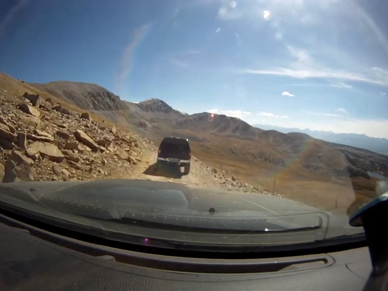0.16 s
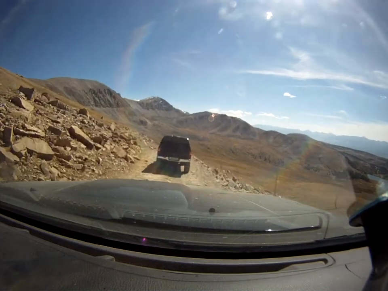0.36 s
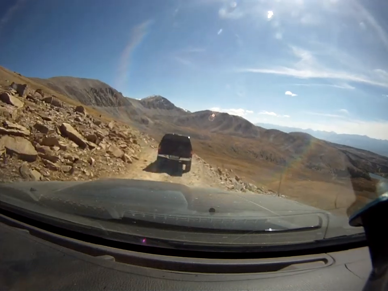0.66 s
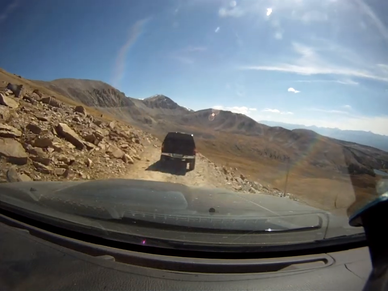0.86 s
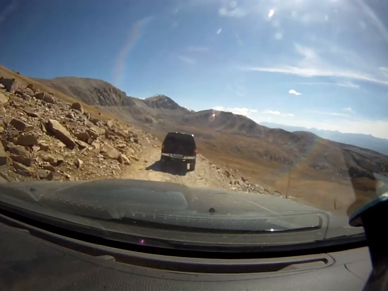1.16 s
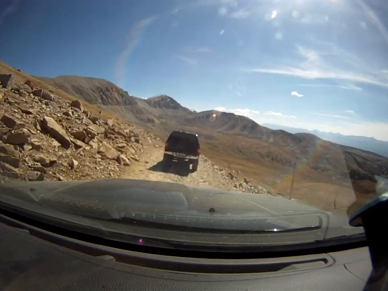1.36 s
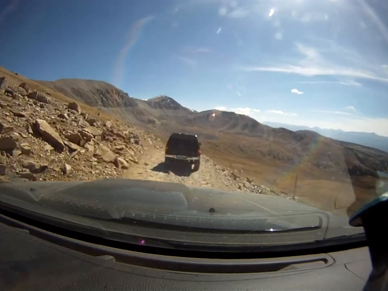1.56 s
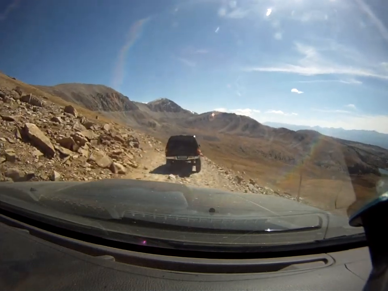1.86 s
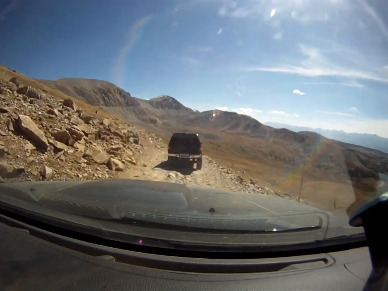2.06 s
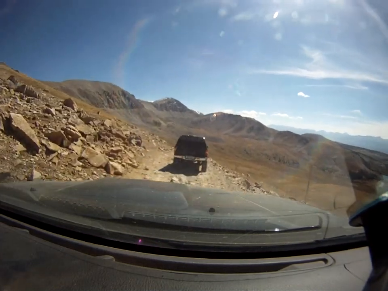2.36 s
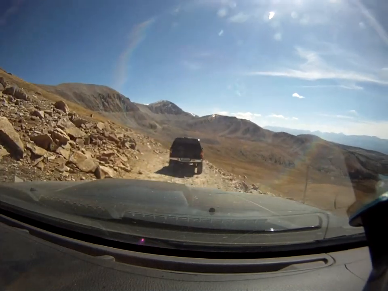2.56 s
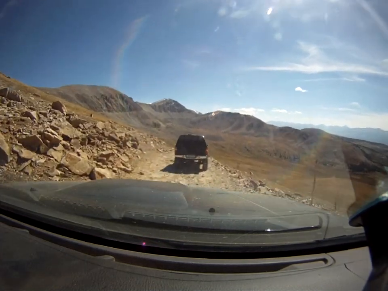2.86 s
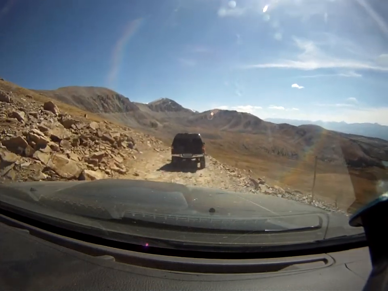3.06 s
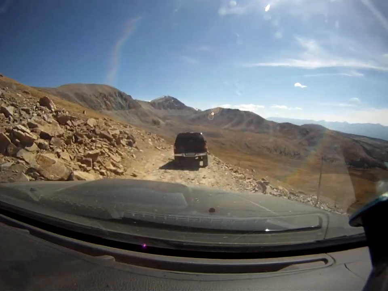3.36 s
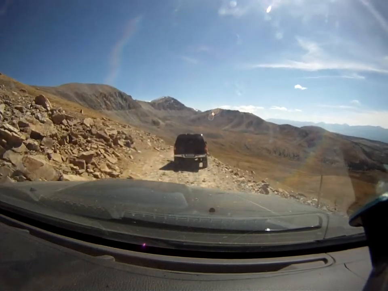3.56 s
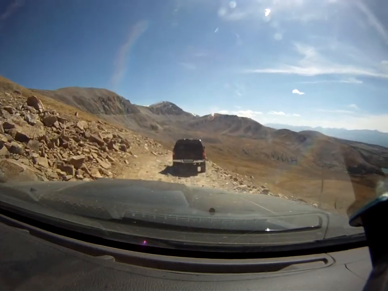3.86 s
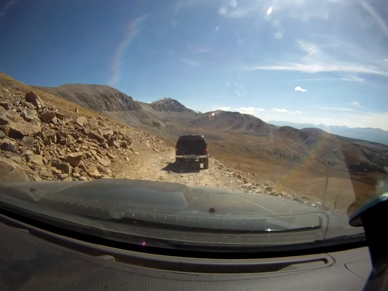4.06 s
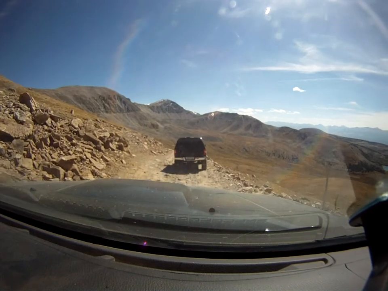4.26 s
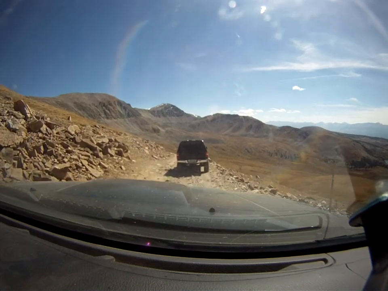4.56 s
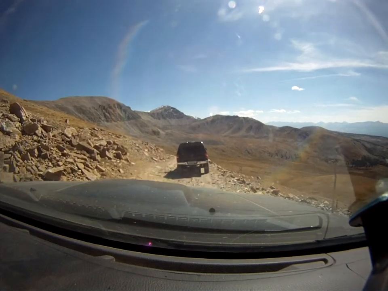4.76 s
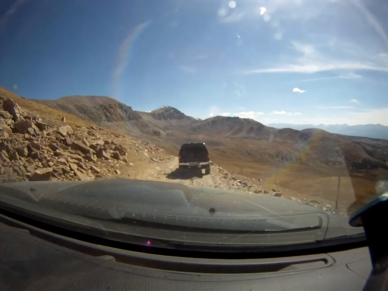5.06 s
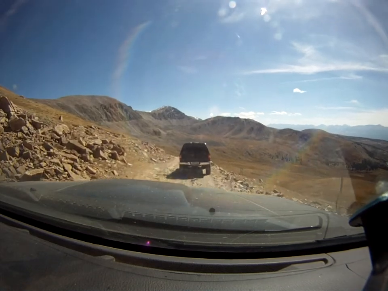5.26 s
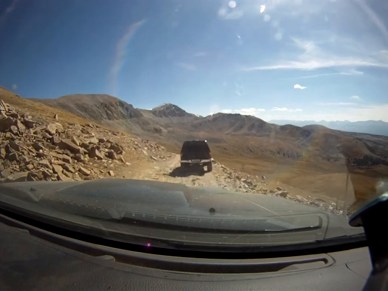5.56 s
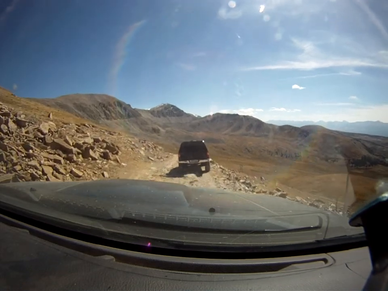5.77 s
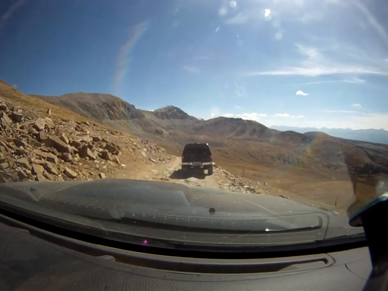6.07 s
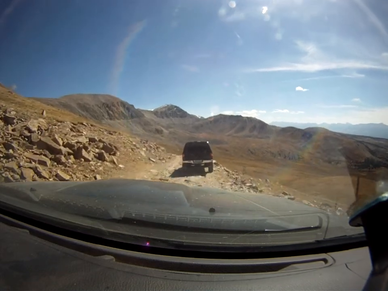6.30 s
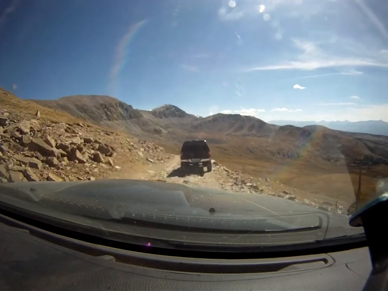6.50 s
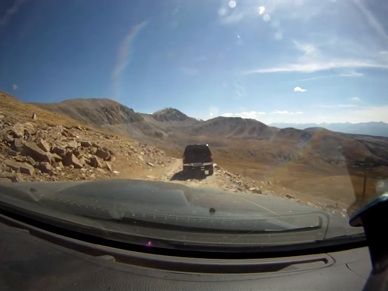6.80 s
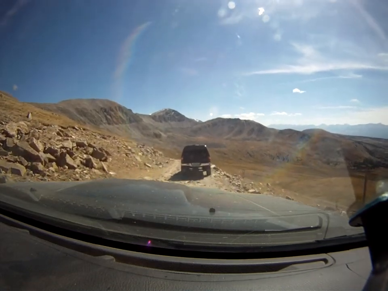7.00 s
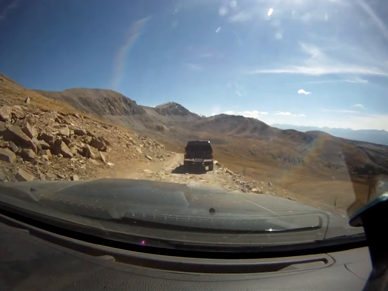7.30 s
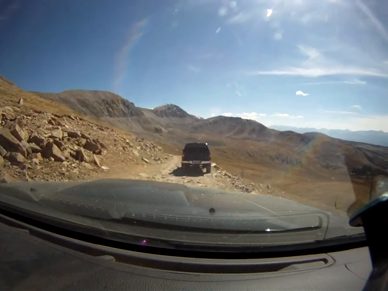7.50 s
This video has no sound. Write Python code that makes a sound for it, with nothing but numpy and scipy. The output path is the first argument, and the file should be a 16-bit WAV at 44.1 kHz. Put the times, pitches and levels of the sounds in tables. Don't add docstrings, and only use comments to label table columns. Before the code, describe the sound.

Inside a slow four-wheel-drive, a low engine hum gradually sinks in pitch while tyres grind over stones, with jolting thumps, knocks and gravel ticks.

```python
import sys
import numpy as np
from scipy import signal
from scipy.fft import rfft, irfft, next_fast_len
from scipy.io import wavfile
from scipy.ndimage import uniform_filter1d, map_coordinates

SR = 44100
rng = np.random.default_rng(int(sys.argv[2]) if len(sys.argv) > 2 else 0)


def wrap_up_sound(samples):
    columns = np.atleast_2d(samples).T
    tamed = np.clip(columns, -1, 1)
    steps = np.round(tamed * 32767).astype(np.int16)
    wavfile.write(sys.argv[1], SR, steps)


def gain_from_db(level_db):
    decades = np.asarray(level_db, float) / 20
    return 10 ** decades


N = 336924

# t/s, f/Hz
HUM_PITCH = [(0, 125.6), (1.1, 123.2), (2.3, 120.7), (3.5, 118.7), (4.7, 116.2), (5.5, 113.9), (6.5, 112.5),
             (7.64, 110.8)]
# t/s, level/dB
HUM_LEVEL = [(0, -33.5), (.64, -35.5), (.85, -33), (1.3, -33), (1.42, -29), (1.55, -34), (1.93, -34.5),
             (2.15, -31.5), (2.4, -37), (3.2, -34), (3.66, -40), (4.0, -33), (4.32, -33.5), (5.2, -40),
             (5.64, -41), (6.0, -36.5), (6.7, -40.5), (7.5, -34.5)]
# t/s, loss/dB, length/s
MOUNT_LULLS = [(.79, 14, 0.02), (.94, 12, 0.036), (2.0, 4, 0.09), (3.77, 12, 0.013), (3.94, 11, 0.038),
               (4.12, 11.5, 0.093), (5.32, 9, 0.048), (6.19, 8.5, 0.032), (6.42, 17, 0.034),
               (6.55, 15, 0.038), (6.93, 9.5, 0.14), (7.15, 7, 0.2), (7.33, 14, 0.034), (7.63, 8, 0.1)]
# t/s, level/dB, length/s
OCTAVE_SWELLS = [(0, -46, 0.17), (1.7, -50.5, 0.96), (2.65, -47.5, 0.19), (2.9, -40, 0.15),
                 (3.3, -49.5, 0.34), (3.5, -50, .15), (3.7, -44.5, 0.22), (4.72, -43.5, 0.15),
                 (5.0, -49, 0.65), (5.9, -46.5, 0.11)]
# t/s, level/dB, length/s
TWELFTH_SWELLS = [(.5, -58, 0.23), (2.6, -50, 0.21), (2.95, -50.5, 0.29), (3.3, -50, 0.15), (3.7, -51, 1),
                  (4.28, -49, 0.1), (4.7, -52, 0.11), (5.5, -60, 0.28)]


def engine():
    turns = np.cumsum(curves(HUM_PITCH)[0] + 0.2 * wobble(8)) / SR
    hum_db = curves(HUM_LEVEL)[0] - summed(MOUNT_LULLS)
    levels = [hum_db, swells_db(OCTAVE_SWELLS, -79), swells_db(TWELFTH_SWELLS, -79)]
    out = np.zeros(N)
    for k, db in enumerate(levels):
        unsteady_db = 0.8 * wobble(15)
        out += gain_from_db(db + 2.0 + unsteady_db) * np.sin(2 * np.pi * (k + 1) * turns + k)
    return out


# f/Hz, level/dB per Hz
HEAVE_SPECTRUM = [(8, -34), (15, -1), (28, 0), (40, -1), (50, -12), (70, -50), (110, -120)]
# f/Hz, level/dB per Hz
BOOM_SPECTRUM = [(25, -50), (40, -12), (49, 0), (58, -1), (72, -12), (100, -12), (135, -30), (230, -120)]
# t/s, level/dB, length/s
HEAVE_SWELLS = [(.2, -28, 0.073), (.45, -25.5, 0.13), (.62, -27.5, 0.24), (.8, -29, 0.2),
                (1.13, -26.5, 0.097), (1.32, -28.5, 0.1), (1.64, -28, 0.043), (1.78, -24, 0.06),
                (2.33, -26, 0.044), (2.47, -21.5, 0.022), (2.57, -31, 0.04), (2.68, -35, 0.086),
                (2.92, -27.5, 0.069), (3.15, -33, 0.2), (3.45, -26.5, 0.049), (3.56, -27.5, 0.036),
                (3.9, -33, 0.2), (4.08, -32, 0.068), (4.23, -37, 0.053), (4.34, -32, 0.04),
                (4.84, -32, 0.11), (5.1, -33.5, .12), (5.25, -32.5, 0.13), (5.48, -24.5, 0.084),
                (5.87, -31.5, 0.11), (6.0, -34, 0.036), (6.2, -43, 0.11), (6.55, -38.5, 0.23),
                (7.21, -37, 0.065), (7.33, -35.5, .1)]
# t/s, level/dB, length/s
BOOM_SWELLS = [(.0, -28.5, 0.09), (.33, -32.5, 0.23), (.62, -28.5, 0.092), (.8, -28, 0.21),
               (1.07, -27, 0.051), (1.24, -34, 0.053), (1.45, -35.5, 0.23), (2.42, -30, 0.1),
               (2.57, -28, 0.028), (2.68, -35, 0.075), (2.93, -35, 0.12), (3.15, -36.5, 0.074),
               (3.34, -30.5, 0.043), (3.56, -33.5, 0.055), (3.78, -29, 0.082), (4.17, -36.5, 0.034),
               (4.3, -41, 0.042), (4.72, -37, 0.054), (4.87, -37, 0.16), (5.17, -48, 0.037),
               (5.33, -35, 0.069), (5.47, -27.5, 0.063), (5.66, -31.5, 0.13), (5.87, -35, 0.037),
               (6.11, -38, 0.034), (6.36, -40, 0.054), (6.55, -40, 0.25), (7.21, -32, 0.045),
               (7.45, -44, 0.093), (7.6, -38, 0.091)]


def body():
    heave_db = swells_db(HEAVE_SWELLS, -38)
    boom_db = swells_db(BOOM_SWELLS, -41)
    spectra = (HEAVE_SPECTRUM, BOOM_SPECTRUM)
    swings = np.array([coloured(rng.standard_normal(N), spectrum) for spectrum in spectra])
    power = np.abs(uniform_filter1d(swings ** 2, SR // 12, axis=1))
    heave, boom = swings / np.sqrt(1.5 + power)
    return gain_from_db(heave_db) * unit(heave) + gain_from_db(boom_db) * unit(boom)


# t/s, weight on the tread/dB, loose stones/dB
TREAD_LOAD = [(0, -38.5, 0.5), (.72, -39, 0), (1.25, -41.5, 2.5), (1.5, -44, 0.5), (2.04, -42, 0.5),
              (2.19, -38.5, 1), (2.68, -43, 0), (2.96, -41, -0.5), (3.3, -42, 0.5), (3.91, -41.5, 0),
              (4.5, -45, -0.5), (5.15, -43.5, -1), (5.72, -43, -0.5), (5.92, -43, 4), (6.5, -43.5, 0),
              (6.94, -44.5, 0.5), (7.15, -43, 1.5), (7.64, -42, 1)]
# t/s, gain/dB, length/s
TYRE_SLIPS = [(.3, 3, 0.067), (.63, 3, .05), (1.3, 1, 0.14), (2.4, 3, 0.08), (3.82, 4, 0.053),
              (4.55, 2, .04), (4.73, 1, 0.067), (5.02, 2, 0.065), (5.6, -1, .04), (5.93, -1, 0.05),
              (6.64, 2.5, 0.061), (7.1, 0.5, 0.063), (.1, 1.5, .03), (.68, 1.5, .015), (1.53, 0.5, 0.027),
              (1.78, 3, .02), (1.89, -4.5, 0.033), (2.62, 4, .03), (2.73, 2, .03), (3.34, 1.5, .03),
              (4.4, 0.5, 0.014), (5.46, 3, .03), (6.01, -2, .02), (7.46, 4, .02)]
# t/s, gain/dB, length/s
SAND_SPRAYS = [(.15, -1.5, .15), (1.41, 2.5, .07), (4.35, -3, 0.074), (5.0, 1.5, .1), (6.55, 2, .06),
               (7.15, 2.5, 0.12)]
# t/s, gain/dB, length/s
GRIND_SWELLS = [(.1, -1.5, 0.018), (.2, -1.5, .02), (.31, 1, .03), (.42, -3.5, 0.066), (.57, 0, .03),
                (.86, 5, .02), (1.32, 4.5, .02), (1.45, 2.5, .02), (1.54, -1.5, .015), (1.61, 3, 0.019),
                (2.1, -5.5, 0.045), (2.5, 0.5, .02), (2.57, 1.5, .02), (2.67, 0, .02), (3.06, 5, .015),
                (3.33, 4.5, .02), (3.8, 4, .03), (4.05, 4.5, .02), (4.4, 2, .015), (4.53, -0.5, .02),
                (4.76, 6.5, 0.032), (5.05, 0, .02), (5.26, 3, .015), (5.32, 1.5, .03), (5.41, 3.5, .015),
                (5.5, 0, .02), (5.72, 1.5, .02), (6.64, 6, .015), (6.79, 1, 0.012), (6.92, 2, 0.022),
                (7.08, 5.5, .02), (7.21, 5, .015), (7.5, 0.5, .02)]
# f/Hz, level/dB per Hz
GRIND_SPECTRUM = [(70, -120), (105, 1.5), (150, 3), (190, -2), (300, -1.5), (450, -4.5), (570, -10.5),
                  (680, -25), (850, -23.5), (1100, -59), (1500, -120)]
# f/Hz, level/dB per Hz
GRIT_SPECTRUM = [(410, -34), (700, -0.5), (829, -3), (907, -2), (1510, -4.5), (2430, -6.5), (2700, -2.5),
                 (3300, -10.5), (4290, -59), (7260, -120)]
# f/Hz, level/dB per Hz
FIZZ_SPECTRUM = [(2060, -29), (3500, -1.5), (4210, -4), (4740, -0.5), (5210, -4.5), (5800, -8.5),
                 (7540, -9), (12800, -120)]


def tyres():
    grind_db, loose_db = curves(TREAD_LOAD)
    loose_db = loose_db + summed(TYRE_SLIPS)
    grit_db = -56 + 0.62 * (grind_db + 40) + loose_db
    fizz_db = -66.5 + 0.11 * (grind_db + 37.5) + 1.06 * loose_db + summed(SAND_SPRAYS)
    grind_db = grind_db + summed(GRIND_SWELLS)

    lumps = 0.7 * np.tanh(wobble(14))
    scuff_sizes = gain_from_db(np.minimum(4 * rng.exponential(size=N), 6))
    scuffs = (rng.random(N) < 60 / SR) * scuff_sizes
    t = np.arange(SR // 10) / SR
    trail = (1 - np.exp(-t / 0.004)) * gain_from_db(-60 * t / 0.031)
    crunch = np.sqrt(1 + 0.22 * unit(signal.fftconvolve(scuffs, trail)[:N]) ** 2)

    grind = gain_from_db(0.9 * lumps + 1.3 * wobble(50)) * crunch ** 0.6 * patchy(patchy_db=0.8)
    grit = gain_from_db(2.35 * lumps + 0.26 * wobble(27)) * crunch * patchy(patchy_db=1.2)
    fizz = gain_from_db(0.067 * lumps + 0.87 * wobble(25)) * crunch ** 0.68 * patchy(patchy_db=0.0)
    out = gain_from_db(grind_db) * coloured(grind, GRIND_SPECTRUM)
    out += gain_from_db(grit_db) * coloured(grit, GRIT_SPECTRUM)
    out += gain_from_db(fizz_db) * coloured(fizz, FIZZ_SPECTRUM)
    return out


# t/s, level/dB, thud/dB, snap/dB, ring f/Hz
STONE_HITS = [(.5462, -43.5, -7, 2, 1060), (2.9946, -30.5, -2, -1.5, 1390), (3.2278, -28, -6, -5, 2300),
              (3.4868, -33, 4, -33, 1420), (5.8583, -42.5, 1, -18, 2820), (5.9224, -34.5, -26, 2, 2820),
              (6.2408, -31, -1.5, 1, 3030), (6.477, -29, 2.5, -8, 1800), (6.492, -32, -1, -6, 2500),
              (6.591, -46.5, 21.5, -25, 2750), (7.2965, -31, 12.5, -25, 1660), (7.304, -49, 16, -25, 1200),
              (7.4069, -27, -1, 3.5, 1730)]
# t/s, level/dB, thud/dB, snap/dB, ring f/Hz
TRAY_SHAKES = [(1.9907, -44, 12, -28, 1000), (2.2631, -29.5, 11, -1.5, 2160), (3.246, -43.5, 9, -23, 1520),
               (4.0859, -36, 8, -8, 1900), (4.7232, -45, 14.5, -26, 1560), (5.7331, -47.5, 8, 0.5, 1040),
               (6.7067, -29, 10.5, -9, 3200), (6.9141, -44, -8, -27, 2310), (7.0699, -48.5, 10, -23, 1590),
               (7.366, -29, 6, -10, 1450), (7.5573, -45.5, 15, -26, 1210)]
# t/s, level/dB, thud/dB
STOP_BUMPS = [(0.5203, -51, 15), (.82, -40.5, 23), (0.8538, -44.5, 12), (1.275, -51, 16),
              (1.8439, -54.5, 21.5), (1.929, -42, 7), (1.9737, -53, 27), (2.1743, -49.5, 18.5),
              (2.3469, -45.5, 14), (3.0519, -55, 17), (4.397, -53, 5), (5.138, -44, 18), (5.165, -49.5, 18),
              (5.4697, -53, 22), (5.7754, -54.5, 23.5), (6.786, -62, 22), (7.128, -62, 23), (.829, -44, 19),
              (6.72, -52, 20), (7.32, -58, 20)]
# t/s, level/dB, ring f/Hz
GRAVEL_TICKS = [(1.1882, -42, 1120), (2.7, -46, 1060), (2.9585, -42.5, 1100), (3.4, -55, 2500),
                (3.4456, -45, 1440), (4.336, -48.5, 2600), (4.177, -52, 2600), (4, -51, 2800),
                (4.8, -50, 2480), (3.8, -47, 1440), (5.929, -44, 2800), (5.98, -47, 2000),
                (7.633, -46, 1500), (6.6, -46, 2910), (5.9688, -45, 3000), (6.139, -44.5, 1210),
                (6.314, -48, 2800), (6.3859, -49, 2000), (6.571, -50, 1040), (6.9012, -42, 1390),
                (7.248, -50, 2500), (6.8, -44, 3100), (3.157, -47, 2800), (7.279, -45, 2600),
                (1.312, -50, 2000), (5.436, -55, 2600), (4.4, -51, 2200), (5.612, -49.5, 1340),
                (7.157, -54, 2200), (.966, -52, 1900), (4.88, -54, 2600), (6, -51, 1500),
                (4.248, -49, 2800), (6.5, -43, 2000), (3.236, -41, 2500)]


def blows():
    stones = [(*row, -18) for row in STONE_HITS]
    shakes = [(*row, -5) for row in TRAY_SHAKES]
    bumps = [(s, db, thud_db, -21, 1075, thud_db - 22) for s, db, thud_db in STOP_BUMPS]
    ticks = [(s, db, -4, -17, hz, -24) for s, db, hz in GRAVEL_TICKS]
    return stones + shakes + bumps + ticks


def knocks():
    out = np.zeros(N + SR)
    t = np.arange(SR // 6) / SR
    contacts = blows()
    chance = rng.standard_normal((len(contacts), 5, len(t)))
    for (s, db, thud_db, snap_db, ring_hz, tray_db), noise in zip(contacts, chance):
        soft = np.clip((-36 - db) / 8, 0, 1)
        depth = 1.026 ** np.clip(thud_db / 24, 0, 1)
        rise = 1 - np.exp(-t / (0.0012 + 0.0019 * soft))

        def dying(t60, tail):
            return rise * (gain_from_db(-60 * t / t60) + tail * gain_from_db(-60 * t / 0.2))

        def crack_response(f):
            broad = resonance(f, 790, 970) * resonance(f, 2480, 2100)
            return broad / (1 + 1j * f / 3000 - (f / 3300) ** 2)

        push = 0.55 * (t < 0.001)
        thud = dying(0.055, 0.26 - 0.14 * soft) * noise[0] + push
        thud = peaked(filtered(thud, lambda f: panels(f * depth)))
        tray = dying(0.045, 0.055) * (noise[1] + 2.6 * (t < 0.0006))
        tray = peaked(filtered(tray, lambda f: resonance(f, 855, 147) ** 2))
        crack = even(dying(0.031, 0.081) * noise[2])
        crack = peaked(filtered(crack, crack_response))
        ring = even(dying(0.049, 0.061) * noise[3])
        ring = peaked(filtered(ring, lambda f: resonance(f, ring_hz, 0.43 * ring_hz) ** 2))
        snap = dying(0.027, 0.084) * noise[4]
        snap = peaked(filtered(snap, lambda f: resonance(f, 4380, 1850) ** 2))

        blow = gain_from_db(thud_db - 3.5) * thud + gain_from_db(tray_db + 1.5) * tray
        blow += gain_from_db(-3.0 - soft + 0.1 * max(thud_db - 10, 0)) * crack
        blow += gain_from_db(-8.5 + 4.5 * soft) * ring
        blow += gain_from_db(snap_db - 8.5) * snap
        out[round((s - 0.0008) * SR):][:len(t)] += gain_from_db(db) * blow
    return out[:N]


# f/Hz, width/Hz, level/dB
PANEL_MODES = [(213, 90, -29), (337, 163, -3.5), (514, 84, 6), (622, 116, -2)]


def panels(f):
    modes = 0
    for k, (hz, width, db) in enumerate(PANEL_MODES):
        modes = modes + (-1) ** k * gain_from_db(db) * resonance(f, hz, width)
    return modes / (1 + 1j * f / 1100) ** 2


# t/s, f/Hz, level/dB, length/s
TRIM_PINGS = [(.32, 1600, -54, .03), (.55, 4600, -53, .025), (.825, 2550, -48, .012),
              (1.19, 4600, -56, .02), (1.62, 2850, -54, .02), (2.05, 2300, -53, .035),
              (2.19, 1620, -52, .04), (2.35, 1420, -50, .02), (2.8, 1400, -52, .02), (3.82, 1610, -53, .02),
              (4.21, 2300, -58, .05), (4.338, 2850, -55, .012), (4.73, 1590, -53, .03),
              (4.79, 2200, -55, .012), (5.848, 4400, -57, .008), (6.498, 2680, -45, .012),
              (6.595, 2700, -35, .007), (6.594, 1900, -47, .006), (6.596, 3400, -48, .006),
              (5.055, 1800, -58, .02), (5.63, 1300, -54, .015), (7.13, 950, -53, .025)]
# t/s, f/Hz, level/dB, length/s
PANEL_NOTES = [(0.826, 720, -34, .014), (.826, 410, -36, .016), (.862, 520, -41, .02),
               (1.942, 292, -43, .03), (1.932, 1100, -48, 0.0074), (2.178, 480, -43, .012),
               (2.266, 565, -27, .008), (3.058, 520, -41, .014), (3.237, 2000, -38, .014),
               (4.091, 846, -40, .012), (4.735, 1000, -51, .015), (5.141, 500, -35, .01),
               (5.17, 550, -34, .01), (5.483, 556, -46, .02), (5.78, 520, -43, .012),
               (5.869, 71.6, -33, .07), (6.246, 2950, -36, .008), (6.6, 496, -32, .013),
               (6.71, 1390, -36, 0.0095), (6.793, 560, -45, .02), (7.369, 850, -38, .008),
               (7.41, 3900, -40, .01), (.831, 527, -34, .012), (.868, 420, -41, .016),
               (1.987, 480, -37, .016), (2.257, 400, -36, .014), (2.359, 400, -39, .014),
               (2.278, 520, -37, .012), (2.996, 1410, -39, .006), (3.23, 2350, -38, .006),
               (3.269, 400, -40, .01), (4.099, 520, -42, .014), (5.111, 453, -35, .01),
               (5.152, 400, -40, .012), (6.243, 1500, -42, .005), (6.481, 523, -39, .012),
               (6.5, 2000, -44, .012), (6.711, 3200, -41, .007), (6.724, 483, -38, .024),
               (7.305, 372, -28.5, 0.015), (7.299, 560, -27, .01), (6.71, 496, -31, .012),
               (6.74, 520, -42, .024), (1.281, 560, -47, .01), (6.522, 2650, -53, .03),
               (.895, 320, -41, .016), (7.324, 330, -40, .024), (7.37, 330, -31, 0.016),
               (7.413, 370, -33, 0.017)]
# t/s, f/Hz, level/dB, length/s
BODY_LURCHES = [
    (5.456, 36, -26, .07),
    (5.455, 139, -39, 0.045),
    (5.622, 50, -32, .07),
    (5.87, 49, -20.5, 0.079),
]


def pings():
    t = np.arange(N) / SR
    out = np.zeros(N)
    drift = np.cumsum(wobble(90)) / SR
    flutter = gain_from_db(2 * wobble(150))
    for s, hz, db, length in TRIM_PINGS + PANEL_NOTES + BODY_LURCHES:
        near = slice(round((s - 0.1) * SR), round((s + 0.1) * SR))
        u = t[near] - s
        swell = np.exp(-(2 * u / length) ** 2)
        out[near] += gain_from_db(db - 2.5) * swell * np.sin(2 * np.pi * hz * (u + 0.008 * drift[near]))
    return out * flutter


# t/s, level/dB, length/s
AXLE_THUMPS = [(.3, -46, 0.034), (.55, -41.5, 0.031), (.65, -38, 0.026), (.83, -37, .03), (.92, -42, .03),
               (1.05, -48, 0.033), (1.31, -45, 0.032), (1.97, -37.5, 0.037), (2.35, -43, 0.027),
               (2.58, -43.5, 0.037), (3.0, -44, .03), (3.27, -40, 0.027), (3.6, -43.5, .03),
               (3.85, -41, .03), (4.08, -44, .03), (4.77, -42, 0.034), (5.47, -43, 0.037), (5.57, -44, .03),
               (5.87, -41, .03), (6.02, -48.5, 0.034), (6.48, -42, .03), (6.57, -40, .03), (7.1, -49, .03),
               (7.4, -37.5, 0.028)]
# f/Hz, level/dB per Hz
FLOOR_SPECTRUM = [(60, -120), (85, -5), (140, -1), (200, -4), (290, -1.5), (360, -9.5), (500, -120)]


def axle():
    return gain_from_db(swells_db(AXLE_THUMPS, -64.0)) * coloured(rng.standard_normal(N), FLOOR_SPECTRUM)


def resonance(f, hz, width):
    return 1j * f * width / (hz * hz - f * f + 1j * f * width)


def filtered(x, response):
    m = next_fast_len(x.shape[-1] + min(8192, x.shape[-1] // 3))
    return irfft(rfft(x, m) * response(np.fft.rfftfreq(m, 1 / SR)), m)[..., :x.shape[-1]]


def coloured(x, spectrum):
    hz, db = np.transpose(spectrum)
    return unit(filtered(x, lambda f: gain_from_db(np.interp(np.log(f + 1), np.log(hz + 1), db))))


def even(burst):
    z = rfft(burst)
    flat = irfft(z / np.sqrt(uniform_filter1d(np.abs(z) ** 2, size=70)), len(burst))
    return flat * (np.arange(len(burst)) < 0.9 * len(burst))


def patchy(patchy_db):
    z = signal.stft(rng.standard_normal(N), nperseg=512)[2]
    field = uniform_filter1d(rng.standard_normal(z.shape), size=6, axis=0)
    field = uniform_filter1d(field, size=9, axis=1)
    return signal.istft(z * gain_from_db(patchy_db * unit(field)), nperseg=512)[1][:N]


def unit(x):
    return x / np.sqrt(np.mean(x ** 2) + 1e-20)


def peaked(x):
    return x / np.sqrt(uniform_filter1d(x * x, size=300).max() * 3)


def curves(rows):
    s, *cols = np.transpose(rows)
    return [np.interp(np.arange(N) / SR, s, c) for c in cols]


def wobble(rate):
    knots = rng.standard_normal(int(N * rate / SR) + 4)
    return map_coordinates(knots, [np.arange(N) * rate / SR])


def bells(rows):
    t = np.arange(0, N, 64) / SR
    s, size, length = np.transpose(rows)[..., None]
    return t, size, np.exp(-((t - s) / length) ** 2)


def swells_db(rows, rest_db):
    t, db, shape = bells(rows)
    power = gain_from_db(2 * rest_db) + np.sum(gain_from_db(2 * db) * shape ** 2, axis=0)
    return np.interp(np.arange(N) / SR, t, 10 * np.log10(power))


def summed(rows):
    t, size, shape = bells(rows)
    return np.interp(np.arange(N) / SR, t, np.sum(size * shape, axis=0))


def scene():
    return (engine() + body() + tyres() + knocks() + pings() + axle())[None]


def roll_off(x):
    return signal.sosfilt(signal.butter(12, 16370, fs=SR, output="sos"), x)


def record(dry):
    hold_hz, top_hz = 12000, 15300
    squeezed = dry / (1 + np.abs(dry / 0.25) ** 4) ** 0.25
    narrow = filtered(squeezed, lambda f: 1 / (1 + (f / 5800) ** 24) * (f < hold_hz / 2))
    comb = 1 + 2 * np.cos(2 * np.pi * hold_hz * np.arange(N) / SR)
    held = filtered(narrow * comb, lambda f: np.sinc(f / hold_hz) / (1 + (f / top_hz) ** 160))
    return roll_off(held)


dry = scene()
out = record(dry)
wrap_up_sound(out)
```